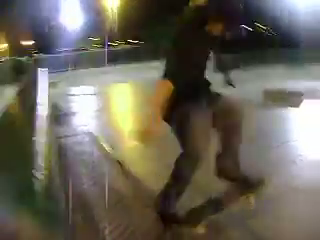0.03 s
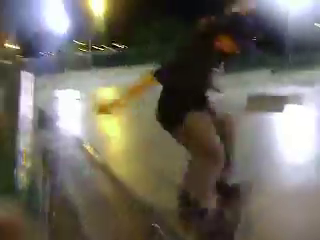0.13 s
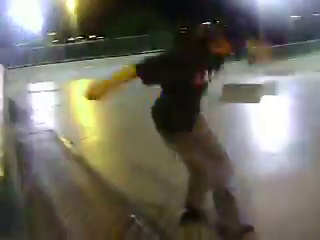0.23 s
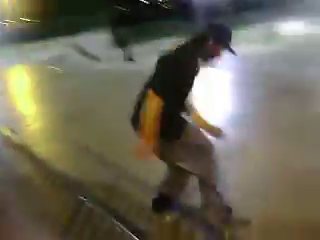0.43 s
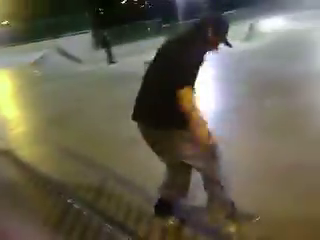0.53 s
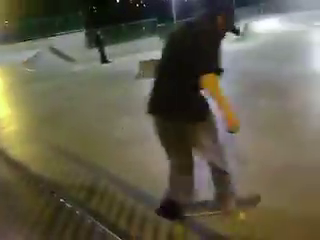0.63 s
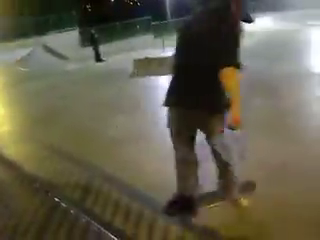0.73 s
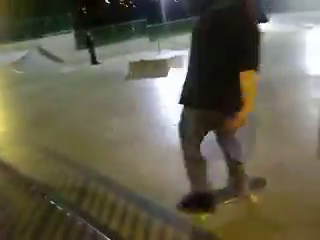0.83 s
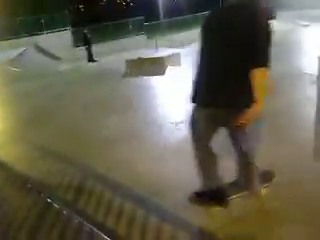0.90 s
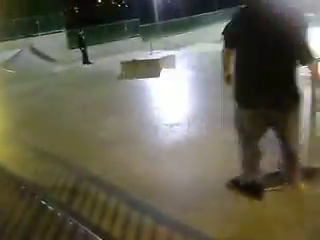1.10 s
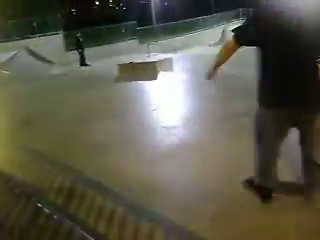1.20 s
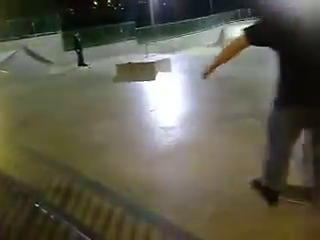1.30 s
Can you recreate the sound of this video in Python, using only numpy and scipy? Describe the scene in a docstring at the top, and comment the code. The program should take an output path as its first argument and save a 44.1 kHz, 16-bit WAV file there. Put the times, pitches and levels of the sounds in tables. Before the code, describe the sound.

Skateboard landing on concrete: barely audible scrapes, one bright tick, a rapid hard double clack with rattle and a dull thump, then quiet rolling with a few light knocks; faint outdoor echo, cheap microphone distorting on peaks.

```python
"""A skateboard slides off a concrete ledge, ticks on its edge, lands with two hard clacks and rolls away.
Each blow is a sum of fading sine waves for the wooden deck and trucks, plus a burst of noise for the rattle.
A few short sine waves make the tick, and one makes a low thump under the second clack. Filtered noise makes
the scrapes and the rolling wheels, and soft blows are the wheels knocking over joints. The open skatepark
adds a faint tail of fading noise to the board's sound; a narrow-band microphone overloads on the loudest peaks."""
import sys
import numpy as np
from scipy import signal
from scipy.fft import rfft, irfft
from scipy.io import wavfile
from scipy.ndimage import uniform_filter1d

SR = 44100
rng = np.random.default_rng(int(sys.argv[2]) if len(sys.argv) > 2 else 0)


def materialize(psi):
    """Save the field psi as 16-bit PCM at rate SR to the path in sys.argv[1].

    A 1-D psi becomes a single channel; in a 2-D psi each row is a channel.
    """
    bounded = np.clip(np.atleast_2d(psi).T, -1, 1)
    quanta = np.round(bounded * 32767).astype(np.int16)
    wavfile.write(sys.argv[1], SR, quanta)


N = 59535  # samples, 1.35 s


def undb(db):
    """Turn decibels into a plain gain."""
    return 10 ** (np.asarray(db) / 20)


def unit(x):
    """Scale to an average strength (rms) of 1."""
    return x / np.sqrt(np.mean(x ** 2))


def since(start):
    """Seconds passed after a moment, zero before it."""
    return np.maximum(np.arange(N) / SR - start, 0)


def fade(age, t60, rise):
    """Quick rise, then an exponential decay that falls 60 dB in t60 seconds."""
    decay = np.exp(-np.log(1000) * age / t60)
    return (1 - np.exp(-age / rise)) * decay


def colour(x, points):
    """Filter by a spectrum of (Hz, dB) points; the result has rms 1."""
    hz, db = np.array(points).T
    f = np.maximum(np.fft.rfftfreq(2 * N, 1 / SR), 1)
    gain = undb(np.interp(np.log(f), np.log(hz), db))
    return unit(irfft(rfft(x, 2 * N) * gain)[:N])


def flutter(db):
    """Gain that wavers as the pressure on the concrete changes."""
    smooth = uniform_filter1d(rng.standard_normal(N), size=350)
    smooth = uniform_filter1d(smooth, size=350)
    return undb(db * unit(smooth))


def grit():
    """Rough concrete: countless tiny contacts with some larger grains among them."""
    grains_per_s, grain_share = 2500, 0.2  # the share is of the power
    grains = (rng.random(N) < grains_per_s / SR) * rng.standard_normal(N)
    tiny_contacts = rng.standard_normal(N)
    return np.sqrt(grain_share) * unit(grains) + np.sqrt(1 - grain_share) * tiny_contacts


def contact(hz, knock_db, clack_db, treble_db):
    """Gain in dB by which the hardness of a contact favours the woody knock, the clack or the treble."""
    return np.interp(hz, [600, 770, 1000, 1500, 2400, 3400],
                     [0, knock_db, knock_db, clack_db, clack_db, treble_db])


# The ways the deck and trucks ring.
# Each row: pitch in Hz, level in dB, time to fade by 60 dB in seconds; each blow adjusts all three.
BOARD_MODES = [(364.8, -7.5, 0.061), (604.6, -4.2, 0.036), (765, -3.0, 0.027), (856, -3.5, 0.037),
               (991, -3, 0.027), (1121, -3.5, 0.028), (1521, -5.3, 0.042), (1693, -3.5, 0.04),
               (1761, -8, 0.046), (1974, -3.0, 0.031), (2220, -9, 0.018), (3450, -15.5, 0.031),
               (3997, -13.5, 0.019), (4642.0, -12.5, 0.027), (4980, -11.5, 0.02)]
# The blows on the board, from the landing to the soft knocks over joints.
# Each row: start in seconds, level in dB, place along the deck from 0 to 1, pitch of the deck's flexing
# in Hz, level of the flexing in dB, knock near 900 Hz in dB, clack near 2 kHz in dB, treble in dB,
# factor on the ring length, level of the rattle in dB, factor on the pitch of the modes.
BLOWS = [(0.3066, -5.5, 0.32, 296.0, -5, -0.5, 2.5, 6.5, 1.07, -13.5, 1.0),
         (0.3094, -7.4, 0.42, 334.0, -17, 1.8, -3, -6, 1.32, -6, 0.988),
         (0.3174, -14, 0.88, 218.0, -2.5, 3, 2.5, 14.5, 0.73, -10.5, 0.95),
         (0.32, -4, 0.15, 291.0, -13.1, -4, 5, -3, 0.36, -12.5, 1.018),
         (0.3624, -3, 0.38, 204.0, -15, 2.2, -4.8, 1.3, 1.08, -13.0, 0.99),
         (0.3662, -1.4, 0.21, 193.0, -10.5, 9, 11, 6.5, 0.36, -15.5, 1.001),
         (0.3754, -5.5, 0.44, 195.0, -8, -1, -7.5, -19.5, 0.47, -8, 1.04),
         (0.404, -33.0, 0.4, 204.0, -13, -4, -1, 2.0, 0.87, -5.5, 0.93),
         (0.416, -26, 0.22, 208.0, -18, -0.5, -7, -3, 0.33, -8.0, 1.03),
         (0.45005, -23.0, 0.34, 228.0, -12.0, -3.0, -4.7, -8, 0.92, -7.5, 1),
         (0.603, -47.0, 0.39, 240.0, -24.5, 3, 5, 4.5, 0.92, -2.5, 1.0),
         (0.69584, -31.0, 0.705, 390.0, -4.5, 0.5, -1, -4.5, 1.34, -5.5, 0.97),
         (0.7599, -20.5, 0.803, 345.0, -15.5, 2.5, 8.5, 1.0, 0.5, -5.5, 1.035),
         (0.7685, -25.5, 0.24, 429.0, -13.5, -1.5, -6, -5, 1.24, -7, 1.045),
         (1.3025, -27.5, 0.45, 307.0, -11.1, 1, 4.5, -3.5, 1.15, -6.5, 0.989),
         (1.3183, -23.5, 0.39, 317.0, -12, -2.0, 1.3, -1.5, 0.8, -10, 1.02)]
# The tone of a blow's crack and rattle. Each row: frequency in Hz, strength in dB per Hz.
CRACK = [(60, -31.5), (300, -1), (470, -10), (900, -2.5), (1300, 4.5), (2100, -2.5), (2500, -2.5),
         (3000, -11), (3500, -6.5), (5000, -9.5), (5500, -21), (6500, -19.5)]
RISE_S = 0.00085  # how quickly a blow or the low thump starts


def blows():
    """Each blow flexes the deck, rings the modes that move at the place struck, and adds a rattling crack.
    The load of the feet shifts the modes a little from blow to blow."""
    out = np.zeros(N)
    f = np.fft.rfftfreq(N, 1 / SR)
    flex_t60_s, flex_rise_s = 0.044, 0.002
    crack_t60_s = 0.05  # before the blow's length factor
    for (start, db, place, flex_hz, flex_db, knock_db, clack_db, treble_db,
         length, rattle_db, tuning) in BLOWS:
        first = int(start * SR)
        age = since(start)[first:first + SR // 5]  # a blow lasts at most 0.2 s

        ring = 0
        for number, (hz, mode_db, t60) in enumerate(BOARD_MODES, 1):
            movement = np.cos(np.pi * number * place)  # how much this mode moves where it is struck
            share = movement * undb(mode_db + contact(hz, knock_db, clack_db, treble_db))
            wave = np.sin(2 * np.pi * hz * tuning * age)
            ring = ring + share * wave * fade(age, t60 * length, RISE_S)

        flex_wave = np.sin(2 * np.pi * flex_hz * age)
        flex = undb(flex_db) * flex_wave * fade(age, flex_t60_s, flex_rise_s)

        crack = colour(rng.standard_normal(N), CRACK)
        hardness = undb(contact(f, knock_db, clack_db, treble_db))
        rattle = irfft(rfft(crack) * hardness, N)[:len(age)]
        rattle = undb(rattle_db) * rattle * fade(age, crack_t60_s * length, RISE_S)

        out[first:first + len(age)] += undb(db) * (ring + flex + rattle)
    return out


def low_thump():
    """A dull low thump, one short sine wave, under the second clack, such as an overloaded microphone gives."""
    start_s, hz, db, t60_s = 0.364, 61.4, 2.5, 0.0091
    age = since(start_s)
    return undb(db) * np.sin(2 * np.pi * hz * age) * fade(age, t60_s, RISE_S)


# The pitches in the sharp tick.
# Each row: pitch in Hz, level in dB within the tick, time to fade by 60 dB in seconds.
TICK_MODES = [(904, -8.5, 0.019), (1010, -5.5, 0.014), (1820, -17, 0.017), (2720, -8.5, 0.012),
              (3250, -5.5, 0.012), (4260, -1.5, 0.007), (4570, 1.5, 0.0063), (5230, 1, 0.0057)]


def tick():
    """A hard, thin tick whose treble arrives a moment before its low ring."""
    start_s, level_db, low_cut_hz = 0.2241, -5.5, 780
    lag_cycles = 0.69  # each pitch waits this many of its own cycles
    snap_db, snap_t60_s = -15.5, 0.032  # the snap is a burst of noise, levelled within the tick
    out = undb(snap_db) * rng.standard_normal(N) * fade(since(start_s), snap_t60_s, rise=0.00024)
    for hz, db, t60 in TICK_MODES:
        age = since(start_s + lag_cycles / hz)
        out += undb(db) * np.sin(2 * np.pi * hz * age) * fade(age, t60, rise=0.0003)
    low_cut = signal.butter(6, low_cut_hz, "high", fs=SR, output="sos")
    return undb(level_db) * signal.sosfilt(low_cut, out)


# The scrapes of board, wheels and shoes.
# Each row: start in seconds, length in seconds, level in dB, hiss compared with the body in dB.
SCRAPES = [(0.031, 0.025, -49.5, -10.5), (0.059, 0.029, -61, 8.5), (0.095, 0.025, -43, -6),
           (0.125, 0.025, -44.5, -1.5), (0.146, 0.015, -41.5, -15.5), (0.193, 0.004, -45, -13.5),
           (0.278, .018, -45.5, -3.5), (0.323, 0.03, -33, -17), (0.72, 0.018, -42, -16),
           (1.075, 0.025, -46, -22)]
# The tone of a scrape's woody body. Each row: frequency in Hz, strength in dB per Hz.
SCRAPE_BODY = [(60, -42), (280, -0.5), (480, -12.5), (1000, 0.5), (1300, -3), (1650, -2.5), (2300, -12),
               (3000, -32.5), (6000, -34)]
# The tone of a scrape's hiss. Each row: frequency in Hz, strength in dB per Hz.
SCRAPE_HISS = [(1500, -21), (3000, -11), (3600, -3), (4300, -1), (5050, -3), (5500, -26.5), (6300, -19)]


def scrapes():
    """Short slides over the grit: a woody body with a hiss on top, both made of filtered noise."""
    attack_s, release_s, flutter_db = 0.0024, 0.0047, 1.95
    body = colour(grit(), SCRAPE_BODY)
    hiss = colour(grit(), SCRAPE_HISS)
    out = np.zeros(N)
    for start, length, db, hiss_db in SCRAPES:
        press = np.minimum(since(start) / attack_s, 1)
        press = press * np.exp(-since(start + length) / release_s)
        out += undb(db) * press * (body + undb(hiss_db) * hiss)
    return out * flutter(flutter_db)


# The tone of the rolling wheels. Each row: frequency in Hz, strength in dB per Hz.
ROLL = [(25, -23), (70, -10.5), (150, -0.5), (280, -9.5), (430, -13), (650, 0.5), (880, 1), (1250, -7),
        (1600, -5), (1900, -5.5), (2250, -17.5), (3000, -26), (3600, -24), (5000, -24), (5600, -36.5),
        (6400, -51)]
# How loud the rolling is over time, before the flutter. Each row: time in seconds, level in dB.
ROLL_LEVEL = [(0, -52.5), (0.099, -48.5), (.19, -50.5), (.26, -48), (.42, -49), (.52, -48), (.65, -53.5),
              (.80, -50), (.87, -53), (1.0, -48.5), (1.08, -46), (1.13, -50), (1.22, -51), (1.35, -52)]
# The tone of the loaded deck's low drumming. Each row: frequency in Hz, strength in dB per Hz.
DRUM = [(60, -32), (130, -9), (185, -1), (260, -3), (350, -2), (480, -9.5), (1000, -53.5)]
# How loud the drumming is over time, before the flutter. Each row: time in seconds, level in dB.
DRUM_LEVEL = [(.30, -90), (.48, -51.5), (.61, -66), (.82, -62.5), (1.06, -54), (1.22, -69.5), (1.35, -62.5)]


def level_over_time(curve):
    """Draw straight lines in dB between (seconds, dB) points and turn them into a gain."""
    return undb(np.interp(since(0), *np.array(curve).T))


def rolling():
    """Wheels roll over the grit a little unevenly; under the rider's weight the deck drums along."""
    unevenness = flutter(1.27)  # dB
    wheels = level_over_time(ROLL_LEVEL) * colour(grit(), ROLL)
    drumming = level_over_time(DRUM_LEVEL) * colour(grit(), DRUM)
    return unevenness * (wheels + drumming)


# The tone of the park's echoes. Each row: frequency in Hz, strength in dB.
PARK = [(60, -10.5), (200, -8.5), (500, -2.5), (900, -5.5), (1700, -7.5), (3000, 5), (4500, -4), (6000, -1)]


def park(x):
    """Scatter from the near ledge and ramps, then a faint tail from farther walls, as fading noise."""
    near = (-24.5, 0.21, 0)  # level in dB, time to fade by 60 dB in seconds, delay in seconds
    far = (-28, 0.65, 0.027)
    out = np.zeros(N)
    for db, t60, delay in (near, far):
        response = colour(rng.standard_normal(N), PARK) * fade(since(delay), t60, rise=0.015)
        response = response / np.linalg.norm(response)
        out += undb(db) * signal.fftconvolve(x, response)[:N]
    return out


def scene():
    """Add up all the sounds; only the blows and scrapes get the park's echoes."""
    deck_low_hz = 100  # the small deck radiates little below this
    low_cut = signal.butter(2, deck_low_hz, "high", fs=SR, output="sos")
    board = signal.sosfilt(low_cut, blows()) + scrapes()
    return (board + park(board) + low_thump() + tick() + rolling())[None]


# The softening of the overload's crackle. Each row: frequency in Hz, gain in dB.
OVERLOAD = [(5500, -0.5), (6700, -12), (10500, -5.5)]


def record(dry):
    """A narrow-band microphone whose loudest peaks are flattened, leaving a soft crackle above its band."""
    mic_top_hz, output_top_hz = 5620, 16400
    clip_level, clip_knee = 0.70, 14  # a higher knee bends more sharply
    mic_band = signal.cheby1(12, 0.2, mic_top_hz, fs=SR, output="sos")
    narrow = signal.sosfilt(mic_band, dry)
    clipped = narrow / (1.0 + np.abs(narrow / clip_level) ** clip_knee) ** (1 / clip_knee)
    soften = undb(np.interp(np.fft.rfftfreq(2 * N, 1 / SR), *np.array(OVERLOAD).T))
    crackle = irfft(rfft(clipped - narrow, 2 * N) * soften)[:, :N]  # what the flattening changes
    output_band = signal.ellip(8, 0.2, 70, output_top_hz, fs=SR, output="sos")
    return signal.sosfilt(output_band, narrow + crackle)


dry = scene()
out = record(dry)
materialize(out)
```